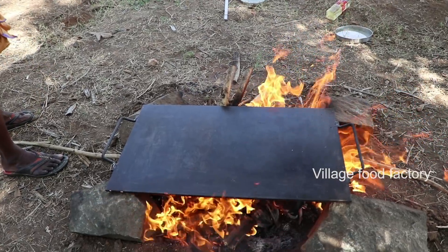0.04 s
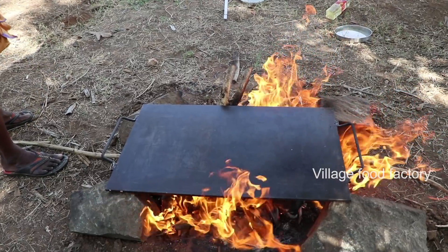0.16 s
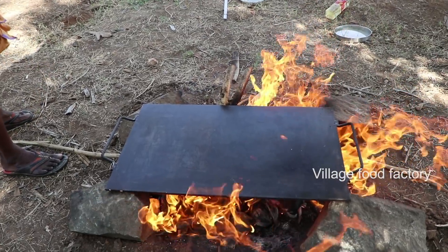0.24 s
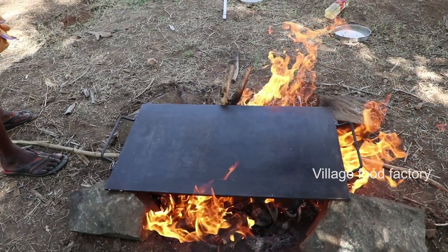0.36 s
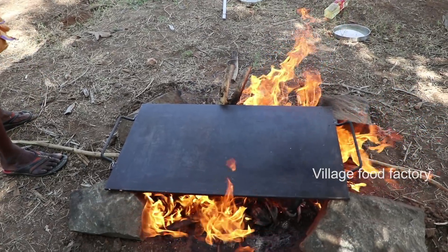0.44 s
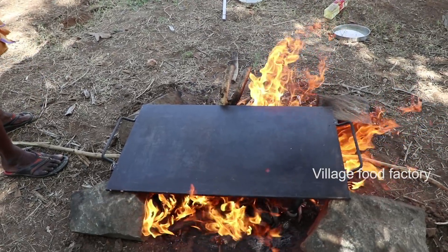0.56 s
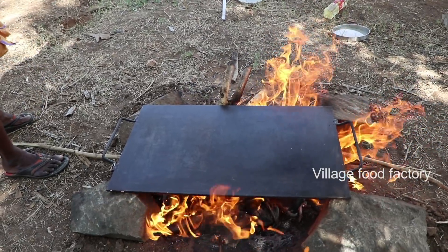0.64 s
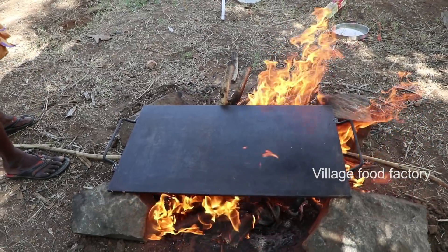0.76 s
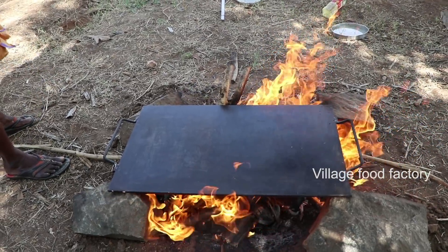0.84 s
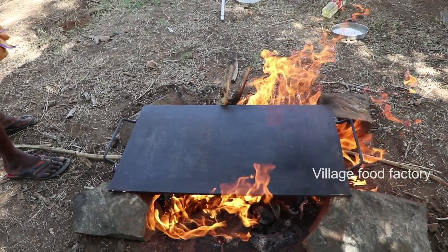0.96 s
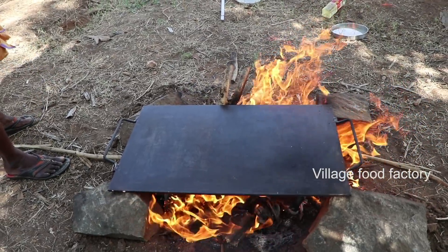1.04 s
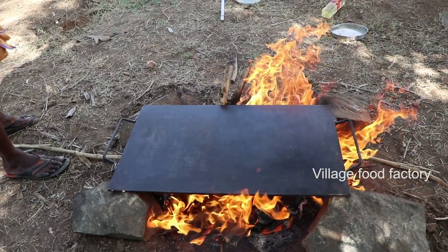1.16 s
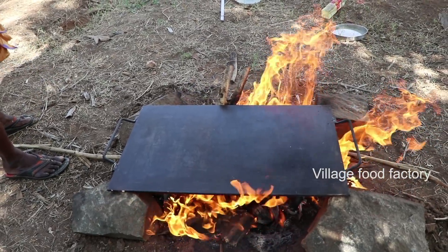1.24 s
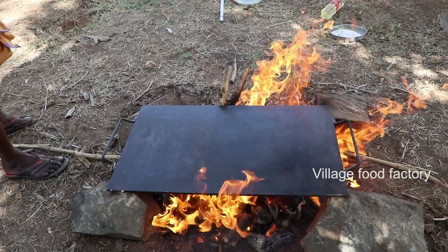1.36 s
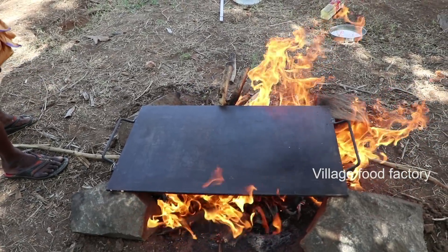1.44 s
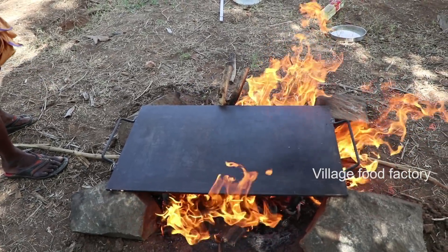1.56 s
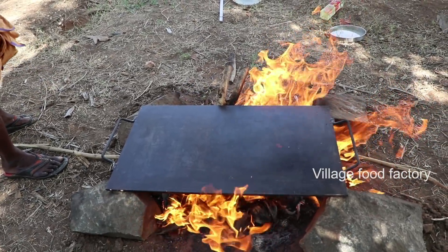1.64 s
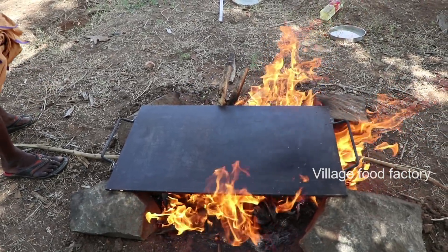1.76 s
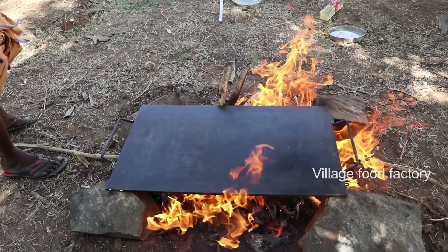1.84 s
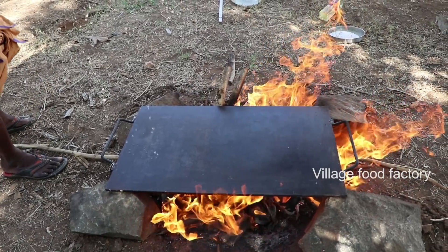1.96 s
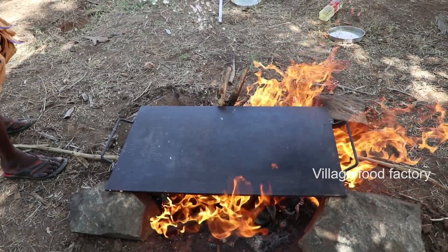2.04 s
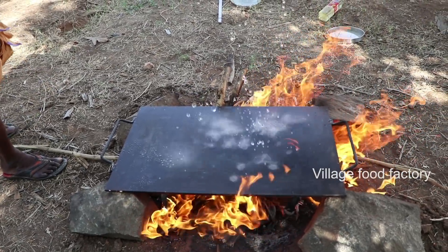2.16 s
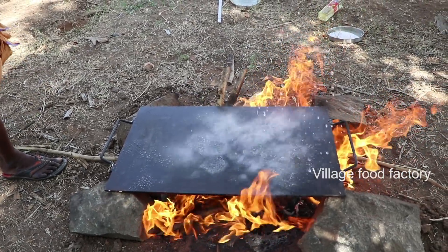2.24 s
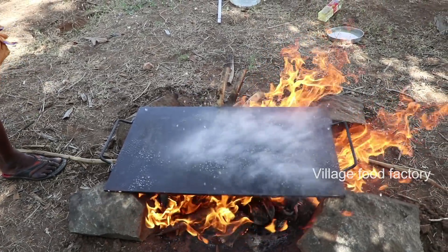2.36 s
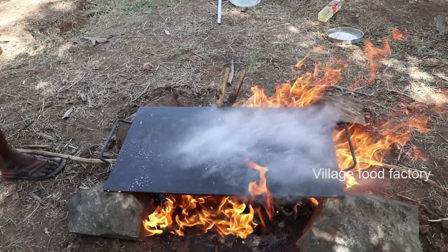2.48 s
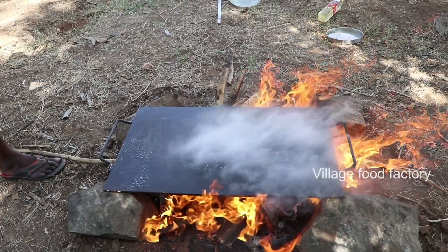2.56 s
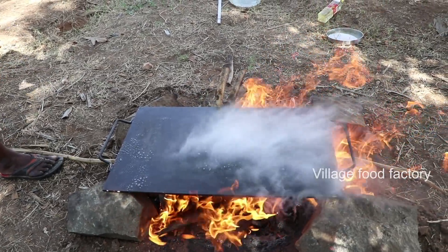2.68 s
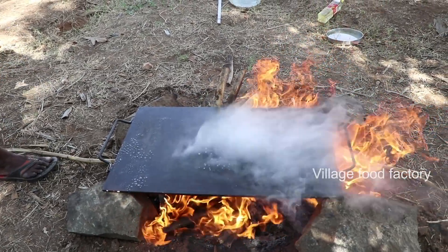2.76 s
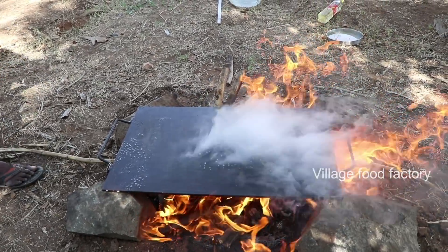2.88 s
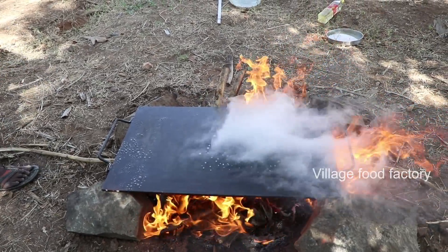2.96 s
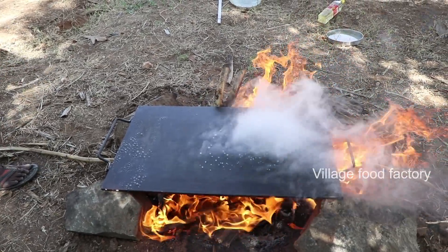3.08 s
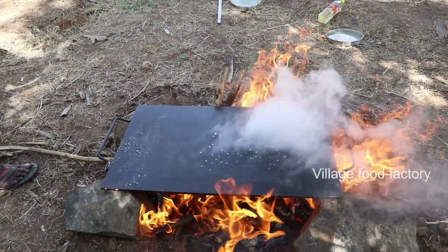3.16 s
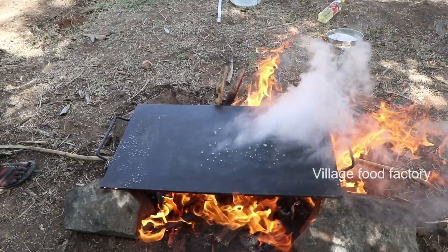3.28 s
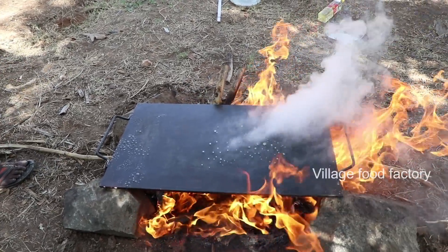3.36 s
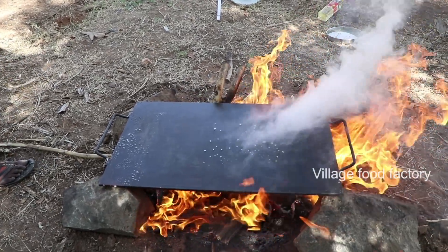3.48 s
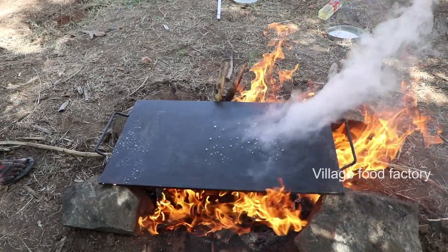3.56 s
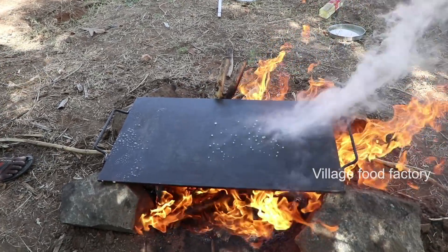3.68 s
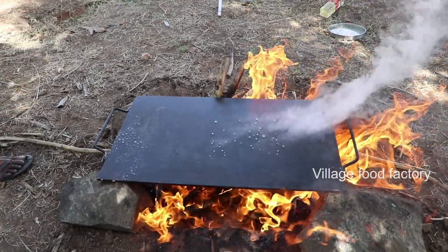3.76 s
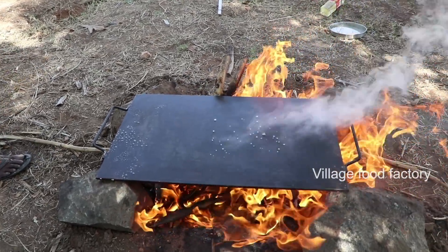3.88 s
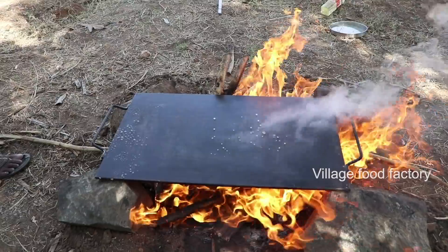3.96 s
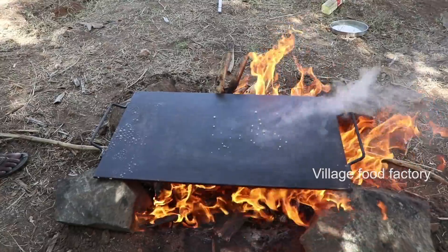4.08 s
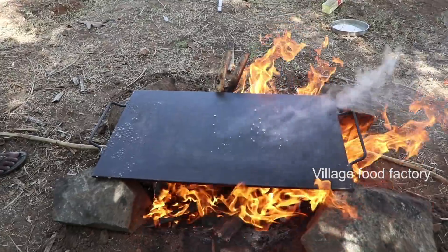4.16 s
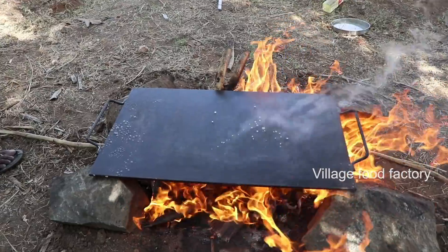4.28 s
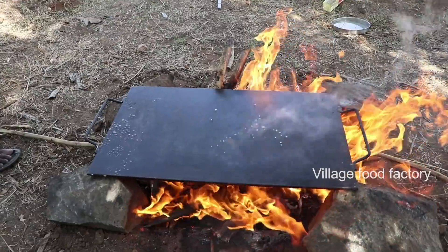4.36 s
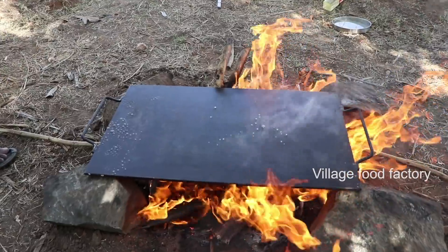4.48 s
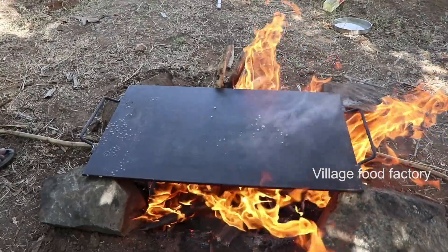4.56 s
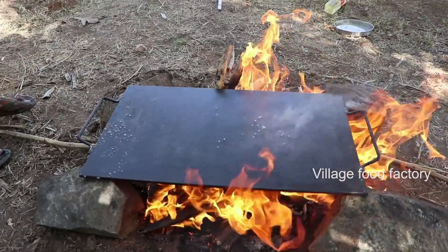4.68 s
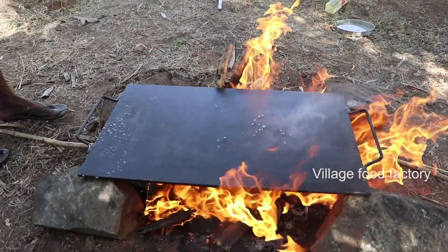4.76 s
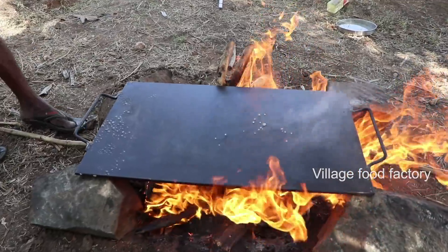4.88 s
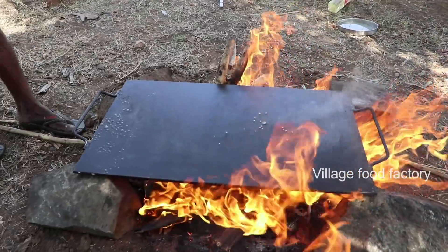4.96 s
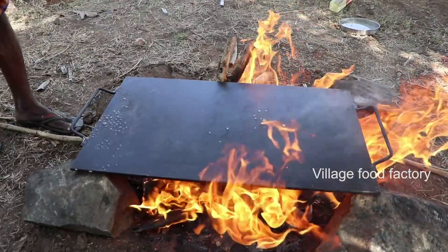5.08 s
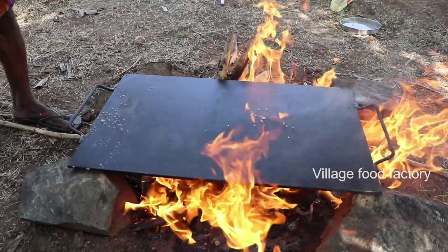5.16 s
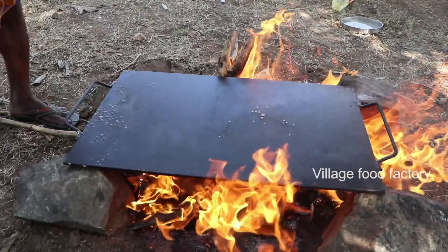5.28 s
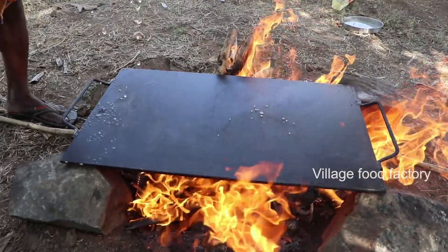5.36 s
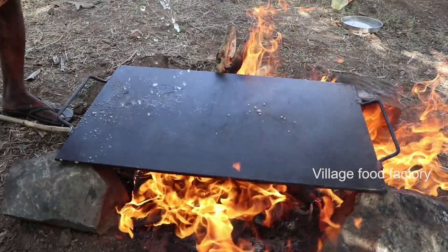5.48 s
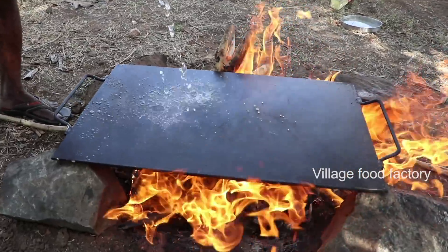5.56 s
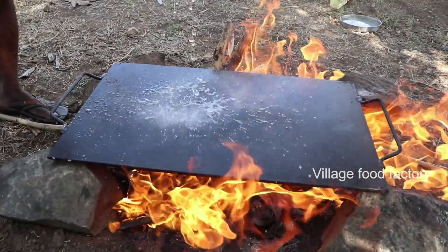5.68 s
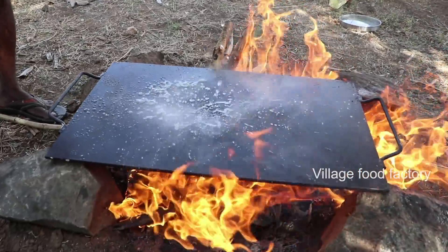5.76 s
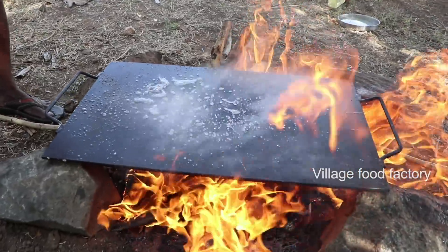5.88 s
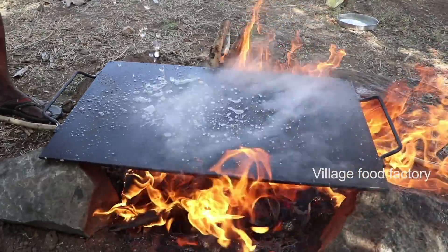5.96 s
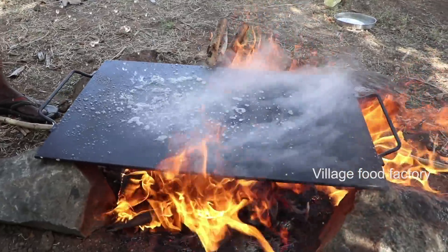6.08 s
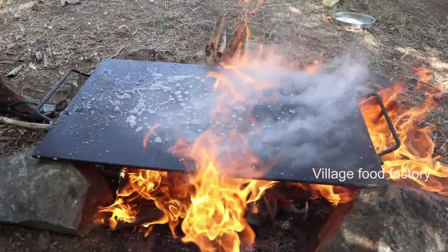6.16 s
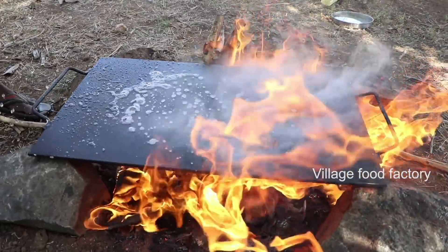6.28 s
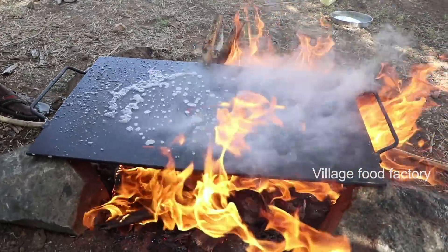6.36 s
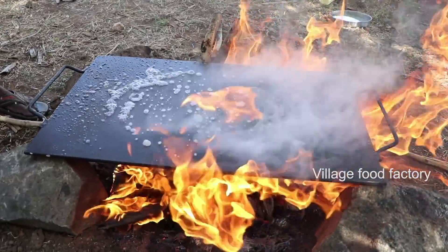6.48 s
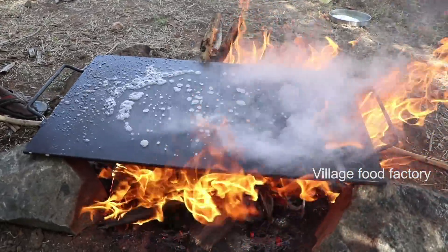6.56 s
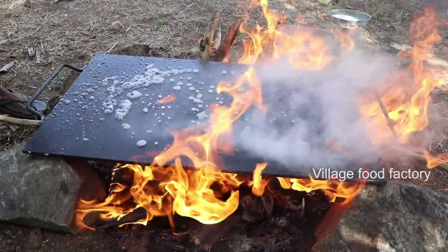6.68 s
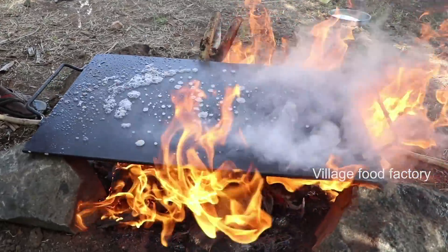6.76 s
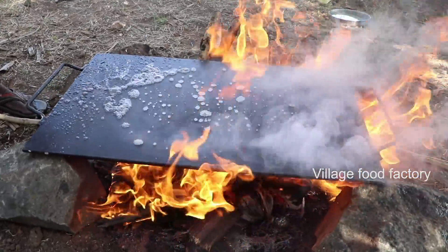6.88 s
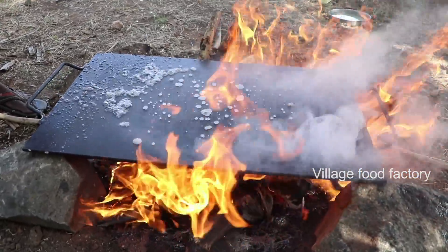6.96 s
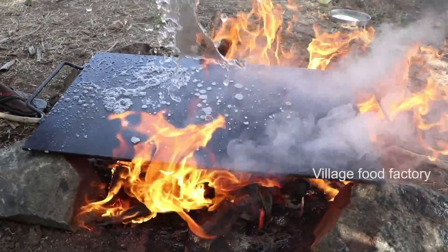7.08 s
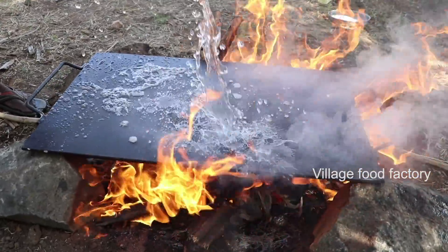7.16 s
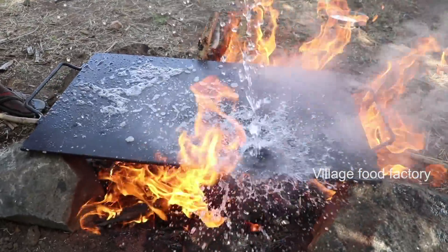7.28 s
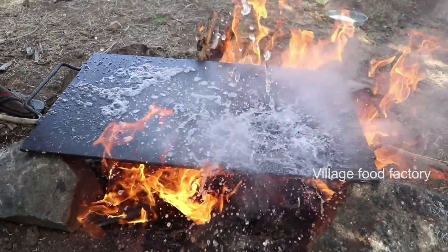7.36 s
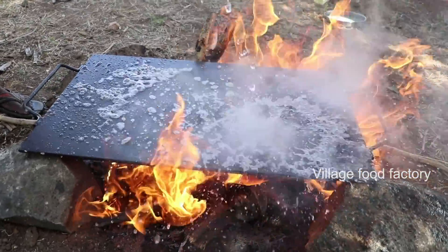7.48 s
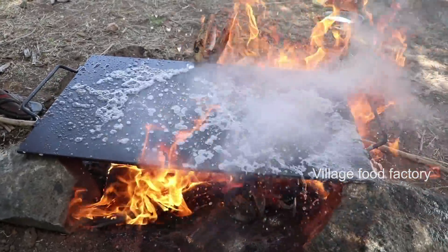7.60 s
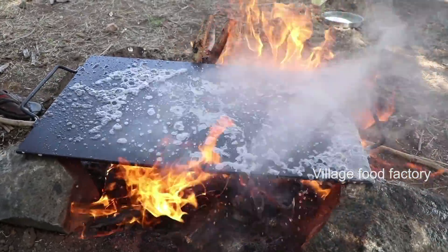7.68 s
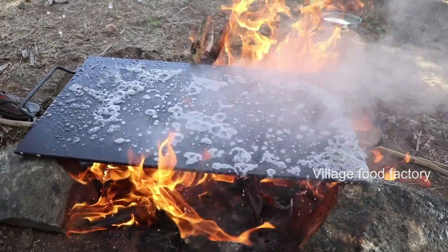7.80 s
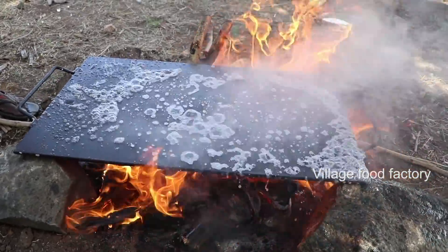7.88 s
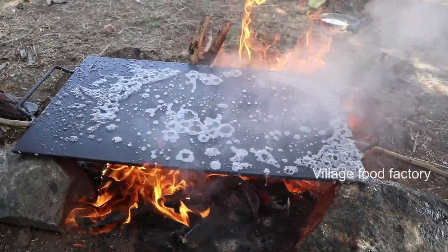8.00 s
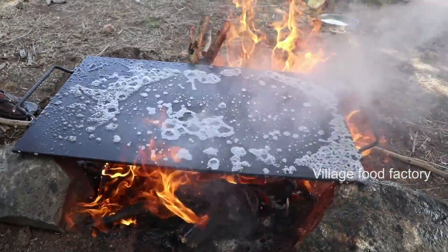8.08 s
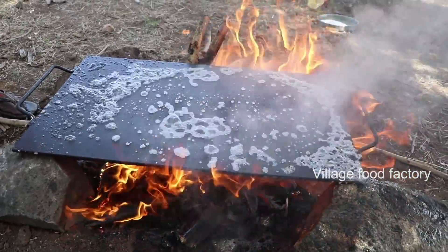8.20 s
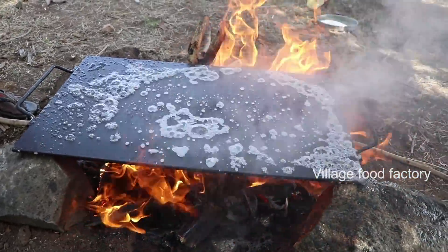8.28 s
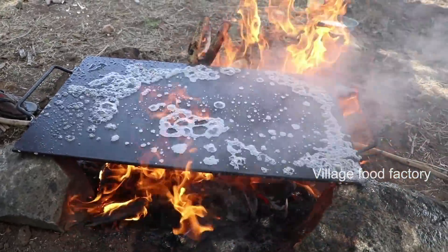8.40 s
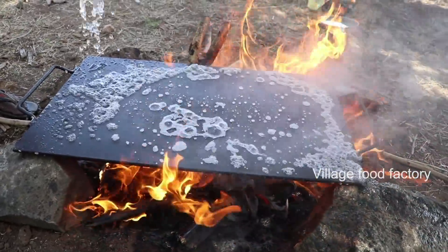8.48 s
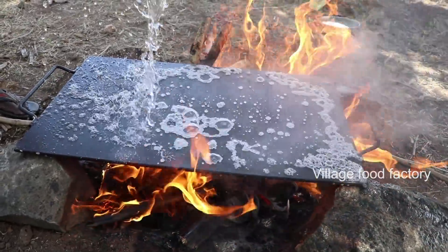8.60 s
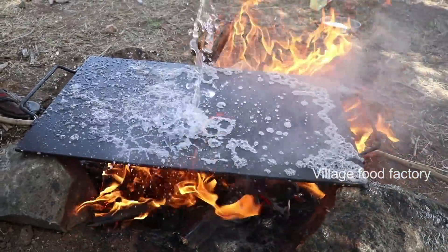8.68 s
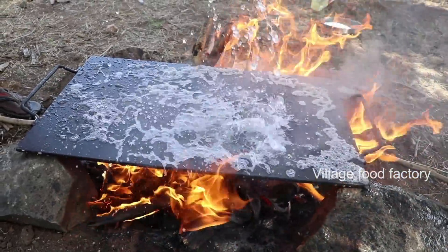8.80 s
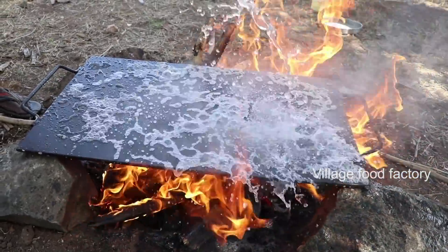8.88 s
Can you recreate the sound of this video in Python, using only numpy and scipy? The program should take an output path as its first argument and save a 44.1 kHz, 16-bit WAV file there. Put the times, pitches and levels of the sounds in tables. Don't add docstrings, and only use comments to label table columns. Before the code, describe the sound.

Outdoors, close to a wood fire in stereo. From 0 to 2 seconds, flames roar low and flutter, sap hisses, and logs crack brightly, with a very loud ringing split at 0.8 and another at 1.4; small birds whistle, clearest between 1 and 2. Around 2.0 the first drops snap onto a very hot steel plate, quickly thickening into a spatter, and by 2.2 a fierce bright steam hiss bursts out, pushing the fire far down. It surges until about 3.5, then thins to drier fizz with separate sharp pops around 4 to 5.5, the fire's roar creeping back. At 5.6 a second splash flares abruptly. The hiss wavers in swells, and from about 7.2 poured water makes it wetter and bubbling, with loud snaps, spatters and dull slaps near 7.7 to 8.8. It is still sizzling when it ends near 8.9.

```python
import sys
import numpy as np
from scipy import signal
from scipy.fft import rfft, irfft, next_fast_len
from scipy.io import wavfile
from scipy.ndimage import uniform_filter1d

SR = 44100
rng = np.random.default_rng(int(sys.argv[2]) if len(sys.argv) > 2 else 0)


def log_audio(samples):
    frames = np.atleast_2d(samples).T
    limited = np.clip(frames, -1, 1)
    pcm = np.round(limited * 32767).astype(np.int16)
    wavfile.write(sys.argv[1], SR, pcm)


def volts(x):
    e = np.asarray(x, float) / 20
    return 10 ** e


N = 394033


def evened(x):
    return x / np.sqrt(np.mean(np.atleast_2d(x).mean(0) ** 2) + 1e-20)


def read(points, hz):
    f, value = np.transpose(points)
    return np.interp(np.log(hz + 1), np.log(f + 1), value)


def curves(rows):
    s, *columns = np.transpose(rows)
    t = np.arange(N) / SR
    inside = uniform_filter1d(1. * (t >= s[0]) * (t <= s[-1] + .02), size=600)
    return inside, [np.interp(t, s, c) for c in columns]


def bump(peak, length, rise):
    rise = np.clip(rise, .05, .95)
    corners = [peak - rise * length, peak, peak + (1 - rise) * length]
    u = np.interp(np.arange(N) / SR, corners, [0, 1, 0])
    return np.sin(np.pi / 2 * u) ** 2


def panned(x, pan_db):
    return x * np.array([volts(pan_db / 2), volts(-pan_db / 2)]).reshape(2, -1)


def add(mix, s, sound):
    part = mix[:, round(s * SR):][:, :sound.shape[1]]
    part += sound[:, :part.shape[1]]


def band(x, hz, width_hz):
    r = np.exp(-np.pi * max(width_hz, 100) / SR)
    return signal.lfilter([1, 0, -1], [1, -2 * r * np.cos(2 * np.pi * hz / SR), r * r], x)


def noise(colour, same, phase, patchy_db, flicker_db, size):
    frames, hz = 4 * N // size + 5, np.fft.rfftfreq(size, 1 / SR)
    a, b, c, d, patches = rng.standard_normal((frames, len(hz), 5)).T
    flicker = evened(uniform_filter1d(patches[0], size=4))
    patches = uniform_filter1d(uniform_filter1d(patches, size=8, axis=0), size=12, axis=1)
    patches = evened(patches.ravel()).reshape(a.shape)
    like = np.clip(read(same, hz), -1, 1)[:, None]
    right = a + 1j * b
    left = like * right * np.exp(1j * read(phase, hz))[:, None] + np.sqrt(1 - like ** 2) * (c + 1j * d)
    level_db = read(colour, hz)[:, None] + patchy_db * patches + flicker_db * flicker
    z = np.array([left, right]) * volts(level_db)
    return evened(signal.istft(z, nperseg=size, noverlap=3 * size // 4)[1][:, :N])


def impulse(colour):
    hz = np.fft.rfftfreq(256, 1 / SR)
    return np.roll(irfft(volts(read(colour, hz)) * np.exp(.6j)), 128) * np.hanning(256)


# (time [s], level [dB])
ROAR = [(0.0, -47), (0.3, -43.5), (0.87, -47.5), (1.5, -45), (2.14, -46), (2.24, -61), (2.49, -67.5),
        (3.26, -66.5), (4.53, -65.5), (5.32, -60), (5.64, -55), (5.74, -63), (6.09, -57.5), (6.27, -66),
        (6.62, -59), (7.9, -53), (8.4, -56.5), (8.93, -55.5)]
# (frequency [Hz], density [dB per Hz])
ROAR_COLOUR = [(22, -30.5), (40, -1), (60, 2.5), (250, 0), (355, -5.5), (500, -16.5), (900, -36.5)]
FLUTTER_COLOUR = [(250, -46), (450, 3), (990, -3.5), (1460, -2), (2200, -8), (3500, -12.5), (4800, -35),
                  (8000, -50)]
SAP_COLOUR = [(1500, 5.5), (4800, 3), (5900, 6), (8300, 5.5), (12000, -5), (14800, -19), (16000, -15)]
# (frequency [Hz], likeness [0-1])
FIRE_SAME = [(30, .78), (60, .88), (130, .97), (290, .93), (640, .7), (1400, .3), (3100, 0)]
# (time [s], draught [dB])
DRAUGHT = [(0, 0), (1.15, 0.5), (1.6, 4), (1.85, 7.5), (1.98, 6.5), (2.1, 11)]
# (peak time [s], length [s], level [dB], rise [share of length])
SAP_JET = (0.96, 1.02, 8.5, 0.7)


def fire():
    in_phase = [(0, 0), (1, 0)]
    roar = noise(ROAR_COLOUR, FIRE_SAME, in_phase, patchy_db=1.0, flicker_db=-0.5, size=1024)
    roar = volts(curves(ROAR)[1][0] + 4.0) * roar
    inside, (draught_db,) = curves(DRAUGHT)
    peak, length, jet_db, rise = SAP_JET
    flutter_db = -52.5 + draught_db
    sap_db = -64 + 1.34 * draught_db + jet_db * bump(peak, length, rise)
    flutter = noise(FLUTTER_COLOUR, FIRE_SAME, in_phase, patchy_db=1.5, flicker_db=.4, size=512)
    sap = noise(SAP_COLOUR, FIRE_SAME, in_phase, patchy_db=1.3, flicker_db=.6, size=256)
    return roar + inside * panned(volts(flutter_db + 1.5) * flutter + volts(sap_db + 2.5) * sap, -0.94)


# (time [s], peak level [dB], main frequency [Hz], left-
# right [dB], width [Hz])
CRACKS = [(.0805, -31, 900, -3, 796), (.227, -33, 2000, -4, 3000), (0.3539, -33, 3960, 7, 6000),
          (0.412, -35, 900, 0, 700), (.425, -44.5, 11000, 0, 7000), (.471, -44, 11000, 0, 7000),
          (.547, -42, 9000, 0, 8000), (.488, -31, 8450, 3, 7000), (.563, -34, 8000, -4, 7000),
          (.6245, -37, 11000, -3, 7000), (.7078, -41, 12000, 0, 6000), (.5825, -30, 10000, -9, 8000),
          (.654, -33, 8990, -3, 9000), (.851, -43, 1500, -3, 2500), (1.112, -48, 8000, 0, 5000),
          (1.1555, -44, 6070, -5, 900), (1.21, -32, 3000, -6.5, 3500), (1.245, -39, 8000, -3.5, 6050),
          (1.288, -35, 1040, -5, 500), (1.7714, -39, 7000, -3, 4000), (1.4247, -29, 9000, -2, 8000),
          (1.4275, -29, 8000, -2.5, 6000), (1.5, -39.5, 10000, 8, 8000), (1.905, -36, 11000, 0, 8000),
          (2.048, -20, 1700, -4, 1200)]


def cracks():
    out, t = np.zeros((2, N)), np.arange(3000) / SR
    for s, db, hz, pan_db, width_hz in CRACKS:
        t60_s = 0.0044 + 0.014 * volts(db) + 3.3 / width_hz
        shared, left, right = rng.standard_normal((3, len(t)))
        spray = shared + .7 * np.array([left, right])
        spray = spray * volts(-60 * t / max(t60_s, .002)) * np.minimum(t / .0005, 1)
        spray = spray + 4.5 * (np.arange(len(t)) == 22)
        ring = band(band(spray, hz, width_hz), hz, 2 * width_hz)
        shaken_log = volts(db / 4 - 4) * evened(band(spray, 1700, 2300))
        ring = evened(ring) + shaken_log
        add(out, s, volts(db) * panned(ring / abs(ring.mean(0)).max(), pan_db))
    return out


# (frequency [Hz], density [dB per Hz])
POP_COLOUR = [(300, -28), (900, -13), (2500, 1), (4800, -1.5), (8500, 2), (13000, 0.5), (16300, -8)]
# (time [s], peak level [dB], left-right [dB], splinter level [dB], knock level [dB])
SPLITS = [
    (0.0945, -22, -8, -20, 0),
    (0.2177, -13, -7, -22, -2),
    (0.8153, -2, -4, -12, -2),
    (1.3732, -16, -5, -16, -20),
]
# (frequency [Hz], width [Hz], level [dB])
SPLIT_RINGS = [
    [(1830, 370, 9), (3230, 340, 4), (6300, 490, -19), (10100, 420, -13), (11700, 580, -20)],
    [(2400, 270, -1.5), (3900, 360, -7), (6400, 400, -31), (8700, 560, -19), (11700, 360, -24),
     (13800, 390, -28)],
    [(1880, 300, 9), (4000, 260, 3), (5660, 200, 10), (8950, 300, 6), (9500, 180, -14), (10730, 210, -17),
     (13000, 250, -7), (14300, 240, -17)],
    [(4180, 370, 15), (7110, 270, -6), (8530, 245, -10), (11600, 310, -7), (13400, 260, -13)],
]


def splits():
    out, t, snap = np.zeros((2, N)), np.arange(2000) / SR, impulse(POP_COLOUR)[118:246]
    for (s, db, pan_db, splinter_db, knock_db), rings in zip(SPLITS, SPLIT_RINGS):
        log = 0
        for hz, width_hz, ring_db in rings + [(950, 500, knock_db)]:
            phase = 2 * np.pi * rng.random() + rng.normal(0, hz / 6000, (2, 1))
            decay = np.exp(-np.pi * width_hz * t)
            log = log + volts(ring_db) * width_hz * decay * np.sin(2 * np.pi * hz * t + phase)
        splinters = band(band(rng.standard_normal((2, len(t))), 8500, 8000), 8000, 12000)
        splinters = splinters * volts(splinter_db - 60 * t / .024)
        crack = (log / abs(log).max() + splinters) * np.minimum(t / 0.00026, 1)
        crack[:, :128] += volts(-1) * snap / abs(snap).max()
        add(out, s, volts(db) * panned(crack / abs(crack.mean(0)).max(), pan_db))
    return out


# (time [s], length [s], frequency [Hz], level [dB])
PEEPS = [(.17, .025, 2950, -59), (.66, .04, 2950, -58), (.855, .085, 3550, -60), (.9, .035, 5450, -57)]
# (time [s], length [s], low [Hz], top [Hz], level [dB])
SLURS = [(0.996, 0.12, 5660, 6360, -42.5), (1.162, 0.11, 5560, 6130, -36.5), (1.33, 0.14, 4880, 5580, -48)]
FLICKS = [(1.515, 0.12, 4460, 6127, -45), (1.71, 0.12, 4210, 6310, -45), (1.94, .1, 4170, 6030, -40.5)]
# (time [share of length], pitch [share of the climb], level [dB])
SLUR = [(0, 0, -20), (.07, .15, -7), (.17, .4, -6), (.33, 0.56, -11), (.55, 0.98, -0.5), (1, 0.85, -22)]
FLICK = [(0, 0, -24), (.08, 0, -10), (.32, .24, -8), (.55, .33, -9), (.63, .6, -8), (.82, 0.99, 2),
         (1, .93, -13)]


def birds():
    dry = np.zeros((2, N))
    chirps = [(row, SLUR) for row in SLURS] + [(row, FLICK) for row in FLICKS]
    glides = [[(s, hz, db), (s + length, hz, db)] for s, length, hz, db in PEEPS]
    for (s, length, low, top, db), shape in chirps:
        glides.append([(s + u * length, low + climb * (top - low), db + shape_db)
                       for u, climb, shape_db in shape])
    for rows in glides:
        s, hz, db = np.transpose(rows)
        t = np.arange(s[0], s[-1], 1 / SR)
        warble = evened(uniform_filter1d(rng.standard_normal(len(t)), size=120))
        pitch_hz = np.interp(t, s, hz) * (1 + .009 * warble)
        tone = np.sqrt(2) * np.sin(2 * np.pi * np.cumsum(pitch_hz) / SR)
        tone = tone * volts(np.interp(t, s, db) + 2.0 * warble[::-1]) * signal.windows.tukey(len(t), .15)
        add(dry, s[0], panned(np.array([tone, np.roll(tone, 1)]), -5))
    t = np.arange(6000) / SR
    sparse = rng.standard_normal((2, len(t))) * (rng.random((2, len(t))) < .05)
    trees = sparse * volts(-60 * t / 0.22)
    trees = trees / np.linalg.norm(trees[0])
    return dry + volts(-5) * signal.oaconvolve(dry, trees, axes=1)[:, :N]


# (time [s], length [s], level [dB], frequency [Hz], rise
SPITS = [(0.21, 0.073, -51, 3600, 0.4), (0.26, 0.084, -42.5, 6300, 0.28), (0.27, 0.052, -40, 2000, 0.3),
         (.225, 0.08, -42, 1200, .3), (.66, 0.12, -56, 7500, 0.5), (.82, 0.14, -47, 8700, .03),
         (1.412, .2, -45.5, 1300, 0.12), (.22, 0.07, -47, 6700, .1), (9.6, 0.064, -31, 2000, .3)]


def spits():
    out = np.zeros((2, N))
    for s, length, db, hz, rise in SPITS:
        u = np.arange(round(length * SR)) / (length * SR)
        left_right, shared, uneven = np.split(rng.standard_normal((4, 9000))[:, :len(u)], [2, 3])
        sputter = volts(1.7 * evened(uniform_filter1d(uneven[0], size=150)))
        shape = np.interp(u, [0, np.clip(rise, .01, .99), 1], [0, 1, 0])
        jet = evened(band(left_right + 0.23 * shared, hz, 0.27 * hz))
        add(out, s, volts(db) * panned(jet * sputter * shape, 0.5))
    return out


# (time [s], peak level [dB], frequency [Hz])
SLAPS = [(1.763, -27.5, 976), (5.653, -33, 245), (7.739, -33, 483), (7.889, -39, 945), (8.01, -30, 550),
         (8.088, -33, 554), (8.119, -30, 202), (8.359, -38, 198), (8.584, -33, 700), (8.664, -36, 610),
         (8.752, -31, 615), (8.809, -41, 585)]


def slaps():
    out, t = np.zeros((2, N)), np.arange(3000) / SR
    for s, db, hz in SLAPS:
        modes = np.sin(2 * np.pi * hz * t) + 0.55 * np.sin(2 * np.pi * 0.66 * hz * t)
        thump = modes * volts(db - 60 * t / 0.047) * np.minimum(t / 0.0014, 1)
        add(out, s, np.array([thump, thump]))
    return out


BUBBLE_HZ = [2100, 3380, 7600, 11100, 13400]


def bursts(per_s, spread_db, lag_samples, mean_lag, pan_db, ring_db=-7):
    when, size, lag, side, kind = rng.random((round(per_s * N / SR), 5)).T
    at = (when * (N - 40)).astype(int) + 20
    clumps = evened(uniform_filter1d(rng.standard_normal(N), size=400))[at]
    height = volts(spread_db * np.minimum(-np.log(size + 1e-9), 2.8) + 2.2 * np.minimum(clumps, 1.5))
    shift = np.round(mean_lag + lag_samples * (2 * lag - 1)).astype(int)
    out, snap = np.zeros((2, N)), impulse(POP_COLOUR)
    for k, hz in enumerate(BUBBLE_HZ):
        own = height * ((kind * len(BUBBLE_HZ)).astype(int) == k)
        left = np.bincount(at + shift, own * volts(pan_db * (side - .5)), N)
        right = np.bincount(at, own * volts(pan_db * (.5 - side)), N)
        grain = snap + volts(ring_db) * evened(band(snap, hz, 1.1 * hz)) * snap.std()
        out += signal.oaconvolve(np.array([left, right]), grain[None], axes=1)[:, :N]
    return evened(out)


# (frequency [Hz], density [dB per Hz])
STEAM_COLOUR = [(180, -56), (350, -14.5), (500, -17), (850, -10.5), (1200, -5.5), (1750, -3), (2750, 0),
                (4830, -1.5), (8100, 4.5), (12500, 2), (15000, -6), (16300, -8)]
# (frequency [Hz], likeness [0-1])
STEAM_SAME = [(130, 1), (400, 0.97), (800, 0.93), (1400, 0.93), (3100, 0.993), (6800, 0.107), (15000, .03)]
# (frequency [Hz], phase [rad])
STEAM_PHASE = [(300, 0.2), (1700, -0.9), (3100, -1.1), (6000, -1), (16000, -3)]
# (frequency [Hz], added left-right [dB])
STEAM_BALANCE = [(300, 9), (700, 8.5), (1300, 8), (2400, 0.5), (4400, 6), (8000, 3), (15000, 3.5)]
# (time [s], strength [dB], wetness [dB], left-right [dB])
BOILING = [(1.97, -53.5, -8, -2), (2.06, -39, -3, -9), (2.11, -27.5, -1.5, -10), (2.19, -21.5, -3.5, -8.5),
           (2.65, -25.5, -4.5, -10), (3.1, -25.5, -6, -11), (3.55, -27, -4.5, -10.5),
           (4.15, -29.5, -8, -12), (4.3, -27, -10, -11.5), (4.58, -34.5, -6, -9), (5.13, -34.5, -12, -9.5),
           (5.535, -35, -8, -8), (5.59, -21.3, -2.3, -7), (5.88, -26.5, -5, -6), (6.33, -30, -4.5, -6.5),
           (7.28, -29.5, -6, -9.5), (8.1, -29, -3, -9), (8.93, -29, -4.5, -10.5)]
# (peak time [s], length [s], level [dB], extra
# wetness [dB], left-right shift [dB])
SURGES = [(2.012, 0.052, 0, 11.5, 0.1), (2.196, 0.042, 2.5, -1, 1), (2.522, 0.15, 1, 0.5, -1.5),
          (2.733, 0.21, 1, 1.5, 0), (2.88, 0.2, 2.5, 0.8, 1.5), (5.69, 0.37, 0.5, -4.5, -1.5),
          (3.591, 0.2, 2.5, 0, 1.5), (3.07, 0.26, 1, 1.5, 1), (3.33, 0.166, 0.5, 0, -1),
          (3.445, .1, 0, -2, -1), (4.655, .08, 0.5, -2.5, -1), (5.854, 0.16, 1.5, -2.5, -0.5),
          (6.0, 0.12, -1.5, 2, 1), (6.43, 0.13, 1, -1, -1), (7.83, 0.1, -1, -0.5, -0.5),
          (8.056, .14, -0.5, -1, 1), (6.16, .12, 0, 0.5, 0), (2.644, .08, -1, -0.5, -0.5),
          (7.278, .08, -0.5, -1, -3), (8.645, .08, -1, 1.5, 2), (7.7, 0.12, 0.5, 1, -2),
          (5.347, 0.13, 1.5, 0, -1), (3.886, 0.57, 0, 1.5, -1), (4.737, 0.094, 0.5, 5, 1),
          (4.903, 0.53, 5, -0.5, -0.5), (5.282, 0.13, -0.5, 0.5, -1), (6.124, 0.44, 3.5, 1.5, -1.5),
          (6.24, 0.31, 0.5, -1, -6), (6.352, .08, 2, -2.5, -2), (6.63, 0.41, 3.5, -0.5, -0.5),
          (6.964, 0.29, 3.5, 1, -1.5), (7.068, 0.053, 1.5, 2, -1), (7.19, .12, 1, 0, -1),
          (7.383, 0.17, 3, 2, 0), (7.525, 0.36, 2, 2.5, -2), (8.28, 0.58, 1.5, -0.5, 0.5),
          (8.544, 0.263, 2, -1, 0), (8.717, 0.11, 3.5, -2, 2), (8.93, 0.24, 3, -1, -0.5)]


def steam():
    inside, slow = curves(BOILING)
    swells = np.array([bump(s, length, 0.48) for s, length, *_ in SURGES])
    fizz_db, wet_db, pan_db = slow + np.transpose(SURGES)[2:] @ swells
    pool = curves(GROUND)[1][0]
    boil_db = -37.5 + 0.88 * (fizz_db + 22) + 0.88 * wet_db + 6 * pool
    flutter_floor = volts(8 + curves(ROAR)[1][0])
    flutter_floor = flutter_floor * np.clip(np.arange(N) / SR - BOILING[0][0], 0, 1)
    boil = np.hypot(volts(boil_db), flutter_floor)
    gurgle = boil * volts(-15 + 9 * pool)

    swelling = np.clip(uniform_filter1d(np.gradient(fizz_db) * SR, size=2000), -50, 150)
    share = np.clip(-0.028 - 0.04 * wet_db + 0.0021 * swelling, 0, 1)
    hiss = noise(STEAM_COLOUR, STEAM_SAME, STEAM_PHASE, patchy_db=1.37, flicker_db=.5, size=512)
    separate = bursts(1500, 3.6, lag_samples=2, mean_lag=1.5, pan_db=6.7)
    mix = np.sqrt(1 - share) * hiss + np.sqrt(share) * separate

    size = next_fast_len(N)
    hz = np.fft.rfftfreq(size, 1 / SR)
    z = rfft(mix, size) * volts(np.outer([.5, -.5], read(STEAM_BALANCE, hz)))
    deep = 1 / (1 + (hz / 510) ** 10)
    low = 1 / (1 + (hz / 1200) ** 6)
    high = 1 - 1 / (1 + (hz / 5000) ** 8)
    parts = [(deep, gurgle), (low - deep, boil),
             (1 - low - high, volts(fizz_db + wet_db)), (high, volts(fizz_db))]
    total = sum(gain * evened(irfft(z * part, size)[:, :N]) for part, gain in parts)
    return inside * panned(total, pan_db)


# (time [s], peak level [dB], left-right [dB])
LANDING = [(2.0027, -18, -5), (2.0075, -11, -8), (2.0138, -11, -5), (2.02, -7, -8), (2.0287, -15, -4),
           (2.0334, -12, -2), (2.0357, -19, -5), (2.0379, -16, -7), (2.0504, -18, -4), (2.0638, -8, -5),
           (2.0793, -16, -5), (2.0827, -7, -6), (2.0907, 3, -1), (2.095, 0, -4), (2.0982, -1, -8),
           (2.1046, -1, -1), (2.1057, 1, -1), (2.1204, 6, 0), (2.124, -1, -4), (2.1313, -2, -6),
           (2.1365, -4, -4), (2.1435, -2, -6), (2.1538, -2, -2), (2.1683, 0, -4)]
# (time [s], peak level [dB], left-right [dB])
POPS = [(2.1918, 5, -8), (2.3091, 3, -8), (3.765, -2, -7), (3.9476, -1, -12), (4.1571, -3, -10),
        (4.2973, -1, -4.5), (4.4007, -6, -8), (4.4675, -4, -9), (4.4896, -8, -7), (4.5018, -8, -8),
        (4.5329, -4, -4), (4.573, -5, -6), (4.6103, 4.5, -14), (4.65, -7, -7), (4.6546, -6, -8),
        (4.7339, -5, -4), (4.7661, -6, -5), (4.8173, 0.5, -3), (4.8339, -2, -5), (4.8569, -5, -4),
        (4.8922, 0, -7), (4.9305, -5, -5), (4.9434, -3, -6.5), (4.9554, -5, -8), (4.9712, 1, -5),
        (5.008, -7, -8), (5.0329, -7, -2), (5.075, -7, -6), (5.096, -11, -7), (5.1223, -14, -7),
        (5.1701, -12, -10), (5.235, -4, -3), (5.2446, 2, -6), (5.2562, -7, -6), (5.3816, 2, -7),
        (5.5238, -5, 2), (5.6199, 7, 3), (5.7367, 3, -2), (5.9404, 4, 0), (5.972, -2, 5), (6.2824, 2, -6),
        (6.311, -5, -6), (6.498, 4.5, 4), (6.512, -2, -5), (6.5676, 2, 0), (6.9921, 1, -13),
        (7.038, -3, -15), (7.0845, 0, -14), (7.1676, -3, -12), (7.4019, 3, -8), (7.474, 9, -13),
        (7.5384, 0, -9.5), (7.6408, -1, -14), (7.8806, -1, -17), (8.0646, -1, -14), (8.4603, 3, -14),
        (8.5202, 0, -10), (8.7121, 0, -4), (8.7239, 1, -8), (8.9259, 6, -10)]
# (time [s], peak level [dB], left-right [dB], dullness [0-1])
SPLATS = [(2.309, -7, -3, .3), (4.6088, -4, -8, 0.1), (4.734, -9, -4, .7), (5.0091, -11, -1, 0.74),
          (5.382, -20, -5, .5), (6.2824, -2, -10, 1), (6.498, -4, -6, .1), (6.511, -8, -4.5, .1),
          (7.6405, -1, -8, .4), (7.954, -1.5, -3, 1), (8.392, -5, -6, 0.7), (8.4603, -2, -8, .4),
          (8.712, -4, -3, .3)]


def pops():
    out, snap = np.zeros((2, N)), impulse(POP_COLOUR)
    rows = [(*row, .1, -24) for row in POPS]
    rows += [(*row, -6) for row in SPLATS]
    rows += [(*row, .15, -17) for row in LANDING]
    lags, spatter = rng.random(len(rows)), rng.standard_normal((len(rows), 200))
    for (s, db, pan_db, dull, spatter_db), lag, drops in zip(rows, lags, spatter):
        fade = volts(spatter_db - 60 * np.arange(200) / SR / 0.0092)
        burst = np.convolve(snap, np.r_[1, drops * fade])
        own = signal.lfilter([1], [1, -.8 * np.clip(dull, 0, 1)], burst)
        late = round(2 * lag)
        pair = np.array([np.pad(own, (2 + late, 3 - late)), np.pad(own, (3, 2))])
        gain = volts(db - 5.5 - abs(pan_db) / 2) / abs(own).max()
        add(out, s - 131 / SR, gain * panned(pair, pan_db))
    return out


# (time [s], echo [share])
GROUND = [(0, .1), (5.3, .1), (5.9, .55), (8.93, .6)]


def ground(x):
    s, share = np.transpose(GROUND)
    dull = signal.oaconvolve(x, signal.firwin(151, 1150, fs=SR)[None], "same")
    delay = round(.00174 * SR)
    echo = np.pad(dull, ((0, 0), (delay, 0)))[:, :N]
    return x + np.interp(np.arange(N) / SR, s, share) * echo


def scene():
    plate = ground(steam() + pops())
    return plate + fire() + slaps() + cracks() + splits() + spits() + birds()


def low_pass(x):
    return signal.sosfilt(signal.butter(12, 16180, fs=SR, output="sos"), x)


def record(dry):
    lowpass = signal.firwin(1601, 15850, window=("kaiser", 8), fs=SR)
    mix = signal.oaconvolve(np.clip(dry, -1, 1), lowpass[None], "same")
    return low_pass(np.clip(mix, -1, 1))


dry = scene()
out = record(dry)
log_audio(out)
```